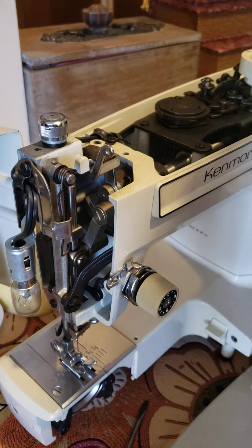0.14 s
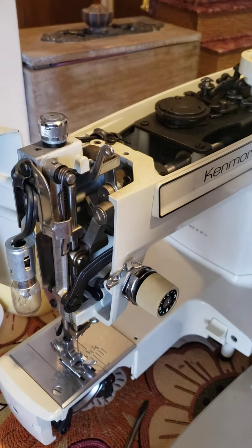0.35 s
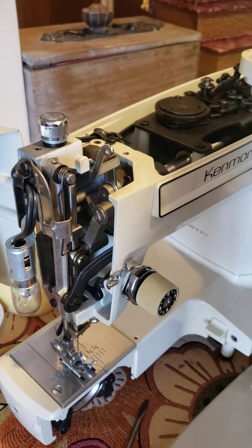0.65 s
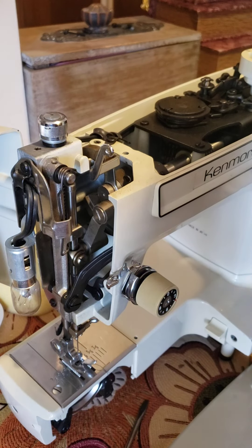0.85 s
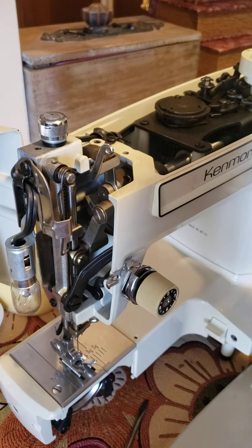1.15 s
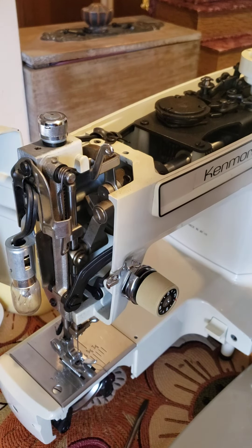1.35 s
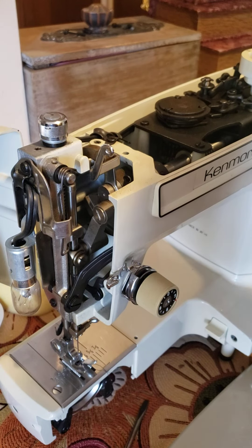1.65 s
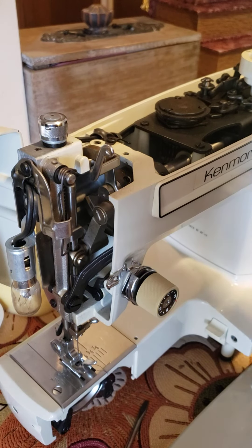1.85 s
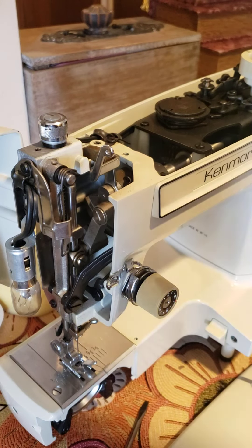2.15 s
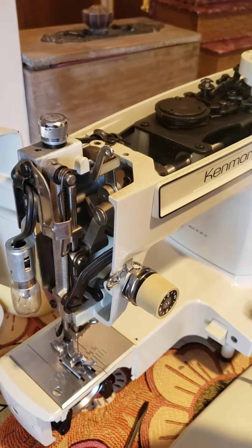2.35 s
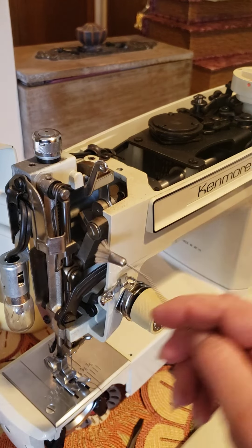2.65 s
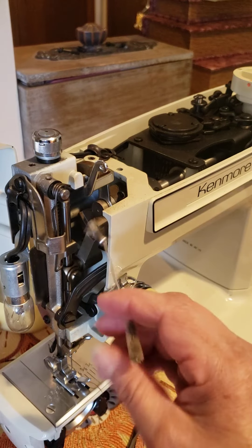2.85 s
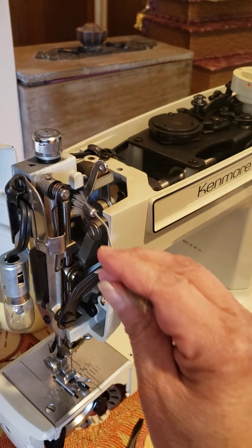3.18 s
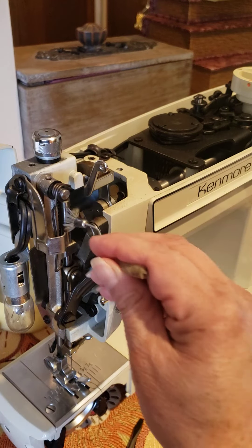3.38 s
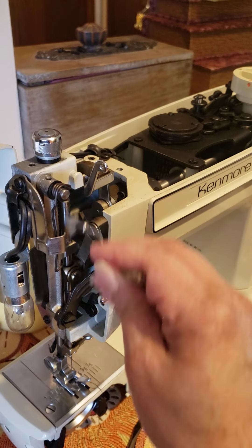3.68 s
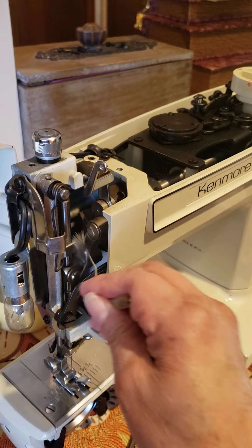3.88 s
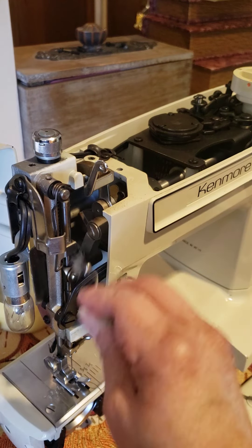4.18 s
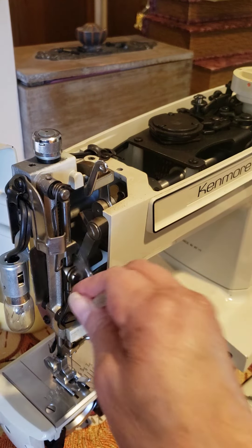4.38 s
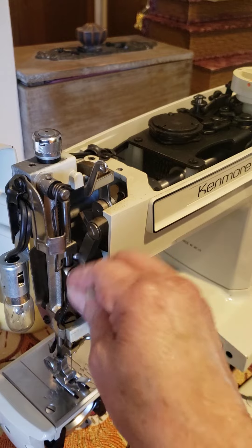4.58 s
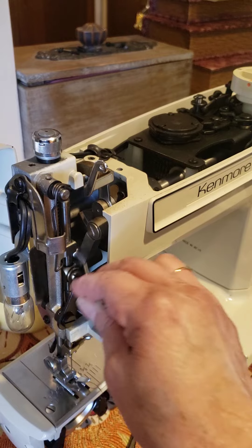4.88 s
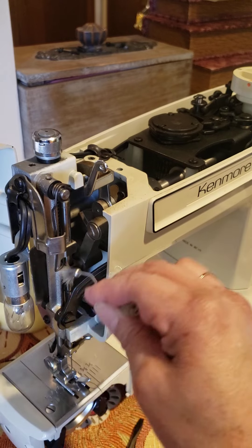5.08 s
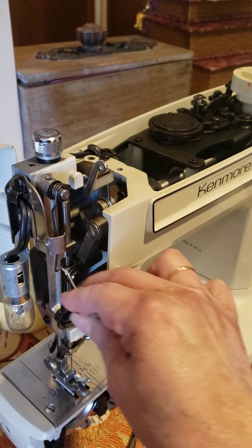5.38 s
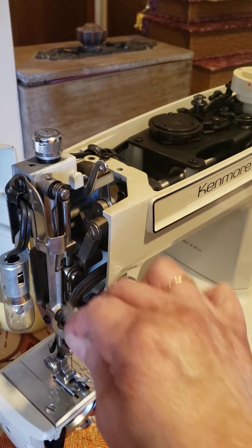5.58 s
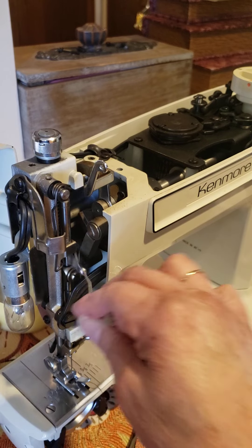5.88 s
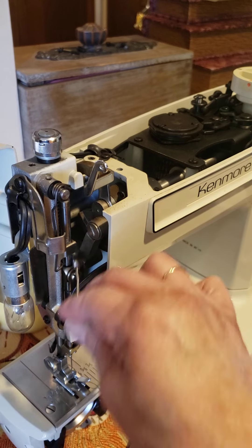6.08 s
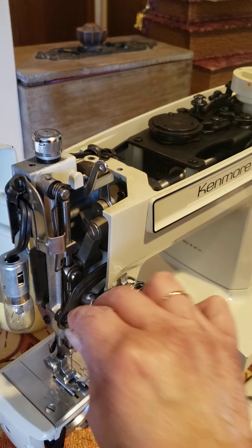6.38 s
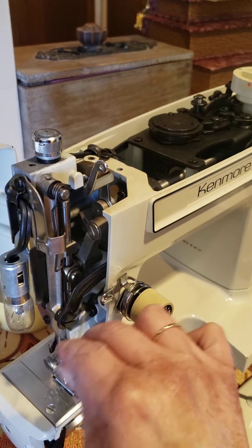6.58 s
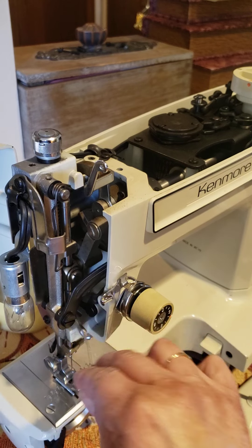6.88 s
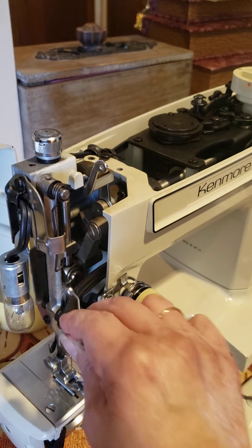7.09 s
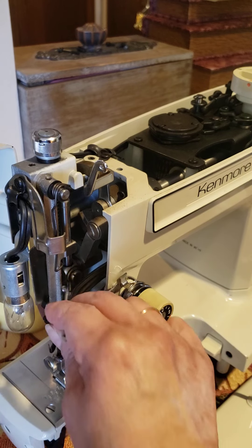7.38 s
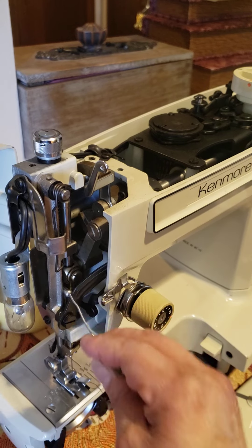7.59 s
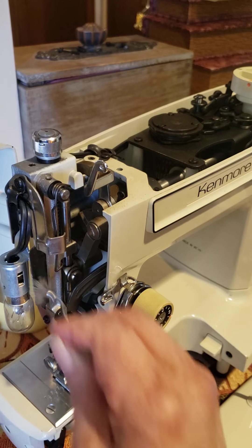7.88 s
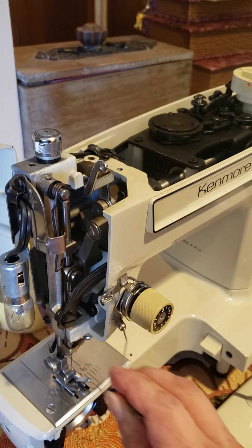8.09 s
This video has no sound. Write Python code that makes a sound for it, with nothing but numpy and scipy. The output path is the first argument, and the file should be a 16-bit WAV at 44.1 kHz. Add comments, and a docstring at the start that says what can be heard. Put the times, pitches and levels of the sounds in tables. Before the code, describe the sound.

A close stereo recording in a quiet, small room with low rumble, soft hiss and a faint throbbing motor hum. Tools knock and slide on a wooden table at left, with a small steel clink. Soft brushing follows, then a thin wire brush ticks and scrapes irregularly on a sewing machine's metal parts, a few ticks sharp and loud.

```python
"""A small wire-handled brush dusts the open head of a sewing machine: wire ticks ring steel links and a housing,
and showers of tiny slips make the bristle scrapes. Before that, a hand picks the brush from among tools:
noise bursts and board modes knock, steel modes clink, and slips make the slides on the table.
An appliance motor hums as wandering sines over the shaped noise of a quiet, lightly reverberant room."""
import sys
import numpy as np
from scipy import signal
from scipy.fft import rfft, irfft
from scipy.io import wavfile
from scipy.ndimage import uniform_filter1d

SR = 44100
rng = np.random.default_rng(int(sys.argv[2]) if len(sys.argv) > 2 else 0)


def unload_audio(sound):
    """Save the sound as a 16-bit wav file, at the path given as the first command line argument."""
    columns = np.transpose(np.atleast_2d(sound))
    # keep every value between -1 and 1, then stretch to whole-number steps
    steps = np.round(np.clip(columns, -1, 1) * 32767)
    wavfile.write(sys.argv[1], SR, steps.astype(np.int16))


N = 363384
AFTER = np.arange(4000) / SR  # seconds after a blow


def gain_of(db):
    """Decibels to amplitude."""
    return 10 ** (np.asarray(db) / 20)


def evened(x):
    """Scales to rms 1."""
    return x / np.sqrt(np.mean(x ** 2) + 1e-20)


def read(points, hz):
    """Reads a table on a log-frequency axis."""
    f, value = np.transpose(points)
    return np.interp(np.log(hz + 1), np.log(f + 1), value)


def lift_db(hz, per_octave):
    """Tilts a spectrum about 8 kHz; flat below 3 kHz, where small parts cannot radiate more."""
    return -per_octave * np.log2(np.clip(hz, 3000, None) / 8000)


def unlike(a, b, same):
    """Mixes a second channel whose likeness to the first is set from -1 to 1."""
    return same * a + np.sqrt(1 - same ** 2) * b


# colour of the room tone, relative: [f/Hz, level/dB]
AIR = [(20, -35.5), (45, -17), (75, -9.5), (93, 1), (106, -6.5), (117, -4.5), (135, -12), (160, -6.5),
       (195, -16.5), (330, -24.5), (400, -17), (480, -25.5), (560, -34), (780, -36), (850, -44),
       (1500, -51), (8000, -62), (11000, -57), (15700, -44)]
# left-right likeness of the room tone: [f/Hz, likeness -1 to 1]
AIR_LIKENESS = [(60, 0.84), (240, 0.94), (950, 0.17), (3770, 0.05), (15000, 0.052)]
AIR_DB = -49  # rms over both ports, before their unequal response


def room_tone():
    """Rumble and microphone hiss: shaped noise whose level drifts in patches of time and frequency."""
    frames, hz = N // 1024 + 5, np.fft.rfftfreq(4096, 1 / SR)
    a, b, c, d, patches = rng.standard_normal((frames, len(hz), 5)).T
    patches = uniform_filter1d(patches, size=12, axis=0)
    patches = evened(uniform_filter1d(patches, size=6, axis=1))
    same = np.clip(read(AIR_LIKENESS, hz), -1, 1)[:, None]
    left = a + 1j * b
    z = np.array([left, unlike(left, c + 1j * d, same)])
    z *= gain_of(read(AIR, hz)[:, None] + 1.2 * patches)
    noise = signal.istft(z, nperseg=4096, noverlap=3072)[1][:, :N]
    return gain_of(AIR_DB) * evened(noise)


# motor lines, rms before their slow wander: [f/Hz, level/dB]
MOTOR_LINES = [(57.8, -56), (231.2, -64), (289, -68), (462.5, -68.5), (749, -78.5)]
# throb of the lowest line: [f/Hz, t/s of a peak, depth 0-1]
BEAT = (0.892, 1.51, 0.58)


def hum():
    """Motor lines whose level and phase wander slowly; the lowest also throbs at a steady rate."""
    t, lines = np.arange(N) / SR, []
    steps = np.linspace(0, t[-1], num=90)
    for hz, db in MOTOR_LINES:
        swell, drift = (np.interp(t, steps, v) for v in rng.standard_normal((2, len(steps))))
        size = np.sqrt(2) * gain_of(db + 2.5 * swell)
        lines.append(size * np.sin(2 * np.pi * hz * t + 0.0037 * hz * drift))
    beat_hz, peak_s, depth = BEAT
    throb = lines[0] * depth * np.cos(2 * np.pi * beat_hz * (t - peak_s))
    return sum(lines) + throb


def burst(spectrum, lift, contact_ms):
    """One short contact: coloured noise dying with the contact time as its time constant."""
    hz = np.fft.rfftfreq(len(AFTER), 1 / SR)
    colour = gain_of(read(spectrum, hz) + lift_db(hz, lift))
    noise = irfft(rfft(rng.standard_normal(len(AFTER))) * colour)
    return evened(noise) * np.exp(-AFTER * 1000 / np.clip(contact_ms, .3, 40)) / 2


def ring(modes, lift, scatter_db, spread):
    """Struck metal or wood: each mode is a close trio, louder or softer by the spot that is hit."""
    f, db, t60 = np.tile(np.transpose(modes), 3)[:, :, None]
    spot, detune, phase = rng.standard_normal((3, len(f), 1))
    size = gain_of(db + lift_db(f, lift) + scatter_db * spot - 60 * AFTER / t60)
    waves = np.sin(2 * np.pi * (f * (1 + spread * detune) * AFTER + phase))
    return (size * waves).sum(0) / np.linalg.norm(size[:, 0])


RISE_S = .00013  # time constant of the onset of every blow


def place(sounds, pan_db, lag):
    """Sets each (t/s, level/dB, sound) louder at the left port; it reaches the right one lag samples later."""
    out = np.zeros((2, N + 8000))
    onset = 1 - np.exp(-AFTER / RISE_S)
    for s, db, sound in sounds:
        for ear, sign in enumerate((1, -1)):
            at = round(s * SR) + ear * lag
            out[ear, at:at + len(sound)] += gain_of(db + sign * pan_db / 2) * sound * onset
    return out[:, :N]


def rub(strokes, spectrum, body, per_s, spread_db, pan_db, same):
    """Friction: tiny uneven slips in clumps; each stroke swells them, tilts their colour and shakes the body."""
    clumps = gain_of(3 * evened(uniform_filter1d(rng.standard_normal(N), size=200)))
    slip_size = gain_of(spread_db * np.minimum(rng.exponential(1, (2, N)), 5))
    slips = slip_size * (rng.random((2, N)) < per_s / SR)
    slips = evened(slips * clumps * rng.standard_normal((2, N)))
    ports = [slips[0], unlike(slips[0], slips[1], np.clip(same, 0, 1))]
    hz, t, z = signal.stft(ports, SR, nperseg=256, noverlap=192)

    s, rise_ms, fall_ms, db, lift, body_db, part_hz = np.transpose(strokes)[:, :, None]
    rise_ms, fall_ms = np.maximum(rise_ms, 2), np.maximum(fall_ms, 2)
    away = 1000 * np.where(t < s, (s - t) / rise_ms, (t - s) / fall_ms)
    power = gain_of(db - 9.04 * away ** 0.83).T ** 2  # one rise or fall time from the peak is 9 dB down

    part_db = 7.7 * np.exp(-(np.log((hz + 1) / part_hz) / 0.35) ** 2)  # the part under the stroke sings along
    colour = gain_of(read(spectrum, hz) + lift_db(hz, lift) + part_db)
    colour /= np.sqrt(np.mean(colour ** 2, axis=1, keepdims=True))

    f, mode_db, _ = np.transpose(body)
    spot = gain_of(mode_db + 3 * rng.standard_normal((len(s), len(f))))  # each spot favours other modes
    resonances = 1 / (1 + ((hz - f[:, None]) / 140.0) ** 2)
    shake = spot @ resonances * gain_of(part_db)
    colour += gain_of(body_db) * shake / np.sqrt(np.mean(shake ** 2, axis=1, keepdims=True))

    size = np.sqrt(power @ colour ** 2).T
    rubbed = signal.istft(z * size, SR, nperseg=256, noverlap=192)[1][:, :N]
    return rubbed * gain_of([[pan_db / 2], [-pan_db / 2]])


SKID_S, SKID_RISE_MS = .004, 2  # a skid or slide peaks this long after its blow; its rise over 9 dB

# tools knock on the table and slide on:
# [t/s, level/dB, bass lift/dB per octave, contact/ms, slide's 9 dB fall/ms, slide's pitch f/Hz]
KNOCKS = [(0.2208, -38.5, 24, 4.1, 48, 2040), (0.238, -37.5, 21, 2.9, 67, 1470),
          (0.2871, -34, 9, 2.8, 73, 2080), (0.364, -32, 4, 3.6, 55, 3950), (0.422, -34, -8, 5.2, 26, 4000),
          (0.4434, -16.5, 3, 4.1, 36, 1810), (0.5665, -35, 0.5, 13, 18, 2000),
          (0.5858, -30, 2, 11, 61, 2010), (0.632, -19.5, -3.5, 4.4, 32, 7050),
          (0.6567, -15, -3.5, 2.5, 16, 4640), (0.6728, -21.5, 13, 5, 28, 910),
          (0.739, -22, -10, 9, 26, 4200), (0.7588, -30, 35, 5.9, 37, 1950),
          (0.8744, -43.5, 16, 8.8, 61, 8800), (0.9691, -40.5, -7, 3.4, 66, 14300),
          (1.009, -51.5, 1, 2.7, 53, 1980), (1.1219, -38, 5, 2.5, 24, 2550),
          (1.3218, -23, 10.5, 0.93, 34.5, 880), (1.3402, -16.5, 0.5, 2.8, 26.5, 8880),
          (1.47, -50, -23, 3, 95, 2880), (1.7, -51, 6, 10, 50, 2660), (1.735, -52, 20, 4.5, 25, 1100),
          (1.764, -58, 24, 5, 18, 1090)]
# a steel tool rattles as it lands: [t/s, level/dB]
CLINKS = [(1.3319, -21.5), (1.3399, -36.5), (1.3464, -28), (1.3684, -32.5)]
# knock and slide colour before the bass lift, relative: [f/Hz, level/dB]
TABLE_COLOUR = [(200, -34.5), (300, -4.5), (1000, -16.5), (2000, -8.5), (4000, -14), (7000, -15),
                (9000, -20.5), (12000, -10), (15700, -14)]
# modes of the table top, relative: [f/Hz, level/dB, t60/s]
BOARD = [(287, -5.5, .05), (400, 4, 0.11), (590, -16.5, 0.013), (872, 15, 0.016)]
# modes of a small steel tool, relative: [f/Hz, level/dB, t60/s]
TOOL = [(7920, -18, .06), (9300, -22, .1), (11580, -24, .1), (13030, -17, .08), (13750, -15, .07),
        (14890, -11, .08), (15110, 0, .13), (15300, -9, .1)]
# slide after each knock: [level/dB from the knock, bass lift/dB per octave, share of the knock's lift added]
SLIDE = (-17, 0.79, 0.14)
RUMBLE_DB, RUMBLE_FOLLOWS = -27, 0.51  # table rumble follows a slide's level only in part: dB, share


def tools():
    """Tools on the table to the left: contact noise with board modes, steel clinks and friction slides."""
    knocks = []
    for s, db, lift, ms, *_ in KNOCKS:
        knock = burst(TABLE_COLOUR, lift, ms) + gain_of(-10.0) * ring(BOARD, 0, 9.5, 0.016)
        knocks.append((s, db, knock))
    clinks = [(s, db, ring(TOOL, 0, 1.6, 0.0049)) for s, db in CLINKS]

    s, knock_db, knock_lift, _, fall_ms, hz = np.transpose(KNOCKS)
    slide_db, lift, share = SLIDE
    db = knock_db + slide_db
    rumble_db = RUMBLE_DB + RUMBLE_FOLLOWS * db - db  # relative to the slide
    rows = np.transpose([s + SKID_S, SKID_RISE_MS + 0 * s, fall_ms, db, lift + share * knock_lift,
                         rumble_db, hz])
    slides = rub(rows, TABLE_COLOUR, BOARD, per_s=9000, spread_db=2.5, pan_db=6, same=.5)
    return place(knocks, 3.7, lag=9) + place(clinks, 14.0, lag=9) + slides


# bristle strokes, the first three standing for the hand brushing cloth: [t/s of the peak,
# length/ms between the points 9 dB down, level/dB, casing rumble/dB from the stroke, touched part f/Hz]
STROKES = [(2.115, 300, -53, -25.5, 2540), (2.4, 290, -61.5, -16, 13100), (2.7, 160, -55, -25, 13600),
           (3.051, 129, -56, -30, 4180), (3.155, 32, -63, -39, 3400), (3.44, 86, -91.5, 16.5, 1300),
           (3.615, 300, -69, -28, 14000), (3.85, 140, -61.5, -12.5, 1370), (3.965, 55, -68, -29, 14100),
           (4.088, 100, -54, -25, 14000), (4.64, 110, -52.5, -23, 1130), (4.72, 69, -64, -26, 2350),
           (4.78, 49, -54, -32, 14000), (4.931, 48, -47, -20, 13700), (5.015, 160, -54, -37, 2050),
           (5.08, 24, -51.5, -31, 14100), (5.248, 61, -56.5, -21, 8350), (5.401, 45, -46.5, -17, 1180),
           (5.465, 47, -66, -5.5, 2350), (5.573, 39, -40.5, -17.5, 2200), (5.589, 32, -39, -28, 6300),
           (5.615, 30, -50.5, -39, 7600), (5.83, 90, -60, -23, 14050), (5.899, 120, -56, -22, 7550),
           (6.11, 76, -51, -24.5, 2140), (6.176, 46, -49.5, -39, 12800), (6.39, 73, -58.5, -14, 2180),
           (6.535, 23, -35.5, -30, 4800), (6.806, 31, -42, -33, 3700), (6.875, 72, -52, -20, 4420),
           (7.221, 33, -44, -32, 6100), (7.321, 134, -65, -21, 12240), (7.445, 44, -46, -13, 1210),
           (7.541, 26, -32, -8.5, 1400), (7.725, 120, -57, -20, 5360), (7.848, 26, -46, -34, 7300),
           (7.885, 47, -52.5, -26, 13100), (8.154, 16, -44, -11.5, 9790)]
# the wire strikes the steel works: [t/s, level/dB, bass lift/dB per octave]
TICKS = [(2.9381, -26.5, 6.5), (3.14, -48, 23), (3.154, -46.5, 19), (3.169, -45, 3), (3.211, -46, -12),
         (3.507, -69.5, 8), (3.52, -50, -12), (3.596, -46, -13), (3.608, -43, -12), (3.804, -47.5, -1),
         (3.827, -34, -6), (3.8627, -38, -3.5), (3.953, -46.5, 2), (4.0801, -37.5, -2), (4.1683, -11, -4),
         (4.3182, -14.5, -5), (4.352, -21, -5), (4.4485, -5.5, -3), (4.603, -24.5, -25), (4.624, -35, -2),
         (4.6406, -20, -7.5), (4.7037, -32.5, -4.5), (4.899, -26.5, -12), (4.9274, -27, -1.5),
         (4.9496, -42, -2), (5.2097, -33, -9), (5.233, -28, -14), (5.254, -29, -10), (5.386, -32, -8),
         (5.3928, -27.5, -3.5), (5.461, -42, -3.5), (5.54, -26, -3), (5.7853, -49, -16), (5.8045, -35, -7),
         (5.852, -29, -15), (6.079, -34, -5), (6.107, -42, -2), (6.144, -42, 3.5), (6.4443, -19.5, 0),
         (6.4966, -38, 7), (6.538, -8.5, -0.5), (6.675, -23, 2.5), (6.787, -30, -11), (6.8645, -26, 2),
         (6.9, -37, -6), (7.136, -17.5, -1.5), (7.504, -36, -1), (7.512, -28, 3), (7.517, -32, -9),
         (7.522, -27, -3), (7.527, -20, 1), (7.532, -15, 0), (7.537, -13, 2), (7.544, -29, 9.5),
         (7.6891, -36.5, -3), (7.756, -32, -12), (8.112, -43, -1), (8.13, -42, -5), (8.151, -23.5, 3.5),
         (8.1555, -20.5, -6), (8.183, -40, -8), (8.2118, -20.5, -3.5)]
# contact noise of wire and bristles before the bass lift, relative: [f/Hz, level/dB]
WIRE = [(900, -50), (2600, -38), (3100, -22), (3980, -23), (4470, -14), (5090, -20), (7180, -12),
        (8740, -17), (11300, -3), (12300, -8), (13400, 0), (14200, -4), (15200, 1), (15800, -3)]
# modes of the steel links before the bass lift, relative: [f/Hz, level/dB, t60/s]
LINKS = [(3400, -26, .05), (4530, -22, .07), (6400, -22, .04), (7490, -18, .05), (9440, -17, .06),
         (11500, -10, .04), (13460, -4, .05), (14900, -4, .04), (15250, 0, .07)]
# modes of the cast housing, relative: [f/Hz, level/dB, t60/s]
CASING = [(1110, 13.5, 0.01), (1340, -1, 0.13), (1640, -13, 0.019), (2135, 5.5, 0.12), (2634, 8.5, 0.014)]
# skid after each tick: [9 dB fall/ms, base level/dB, base bass lift/dB per octave, casing rumble/dB from the skid]
SKID = (22.5, -29, 4.5, -25.5)
SKID_FOLLOWS = .8  # share of the tick's level in dB that the skid takes on
DULL_SKID_DB, DULL_SKID_LIFT = 0.79, 0.14  # level and lift added to a skid per dB/octave of its tick's lift
CONTACT_MS = .9  # time constant of the wire's contact noise
RISE_SHARE = 0.48  # of a stroke's length
# bass lift in dB per octave of a stroke this short, and its change per doubling of length
FIRM_MS, FIRM_LIFT_DB, SLOW_LIFT_DB = 39.4, -1.03, -2


def brush():
    """Wire ticks ring the links and the housing, then skid; bristles scrape as showers of slips."""
    ticks = []
    for s, db, lift in TICKS:
        contact = burst(WIRE, lift, CONTACT_MS)
        links = gain_of(-17.5) * ring(LINKS, lift, 3, 0.015)
        housing = gain_of(-45.5) * ring(CASING, 0, 0.9, 0.054)
        ticks.append((s, db, contact + links + housing))

    fall_ms, skid_db, skid_lift, casing_db = SKID
    links_hz = rng.choice(np.transpose(LINKS)[0], len(TICKS))  # each skid runs over some link
    skids = []
    for (s, tick_db, lift), link_hz in zip(TICKS, links_hz):
        db = SKID_FOLLOWS * tick_db + skid_db + DULL_SKID_DB * lift
        skids.append((s + SKID_S, SKID_RISE_MS, fall_ms, db, skid_lift + DULL_SKID_LIFT * lift,
                      casing_db, link_hz))

    strokes = []
    for s, ms, db, rumble_db, hz in STROKES:
        lift = FIRM_LIFT_DB + SLOW_LIFT_DB * np.log2(ms / FIRM_MS)
        strokes.append((s, RISE_SHARE * ms, (1 - RISE_SHARE) * ms, db, lift, rumble_db, hz))
    scrapes = rub(strokes + skids, WIRE, CASING, per_s=6000., spread_db=2.1, pan_db=0.26, same=0.045)
    return place(ticks, 12.5, lag=4) + scrapes


# decay of the room: [f/Hz, t60/s]
ROOM = [(300, 0.078), (2000, 0.16), (8000, 0.18), (15000, 0.091)]


def room(x):
    """Sparse reflections of random sign, each band dying at its own speed; the bass is alike at both ports."""
    taps = np.zeros((2, SR // 2))
    at = np.arange(100, SR // 2 - 20, 20) + rng.integers(0, 20, (2, (SR // 2 - 101) // 20))
    np.put_along_axis(taps, at, rng.choice([-1., 1.], at.shape), 1)
    hz, t, z = signal.stft(taps, SR, nperseg=128)
    same = np.exp(-(hz[:, None] / 700) ** 2)
    z = np.array([z[0], unlike(z[0], z[1], same)])
    decay = gain_of(-60 * t / read(ROOM, hz)[:, None])
    tail = signal.istft(z * decay, SR, nperseg=128)[1]
    tail /= np.linalg.norm(tail[0])
    return signal.fftconvolve(x.mean(0)[None], tail, axes=1)[:, :N]


def scene():
    """Brush close by, tools a little farther with more room, over the room tone and hum."""
    near, table = brush(), tools()
    wet = gain_of(-5) * near + gain_of(-2) * table
    return near + table + room(wet) + room_tone() + hum()


# the left port is the more open, except in the top treble: [f/Hz, left-right level/dB]
LEAN = [(60, 0.5), (180, 4), (550, 4), (1650, 3), (5000, 4.5), (9000, 9), (15000, -3.5)]
EDGE_HZ = 15800  # low-pass cutoff


def record(dry):
    """Two unequal ports, then the band limit."""
    lean = read(LEAN, np.fft.rfftfreq(N, 1 / SR)) / 2
    ports = irfft(rfft(dry) * gain_of([lean, -lean]), N)
    low_pass = signal.firwin(511, EDGE_HZ, window=("kaiser", 9), fs=SR)
    return signal.oaconvolve(ports, low_pass[None], "same")


dry = scene()
out = record(dry)
unload_audio(out)
```